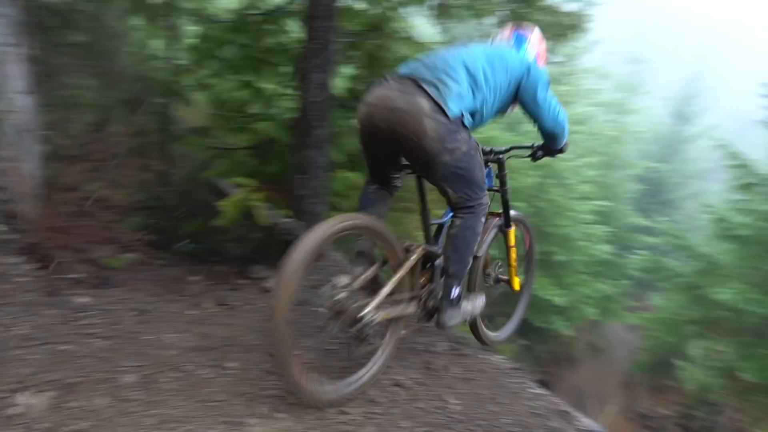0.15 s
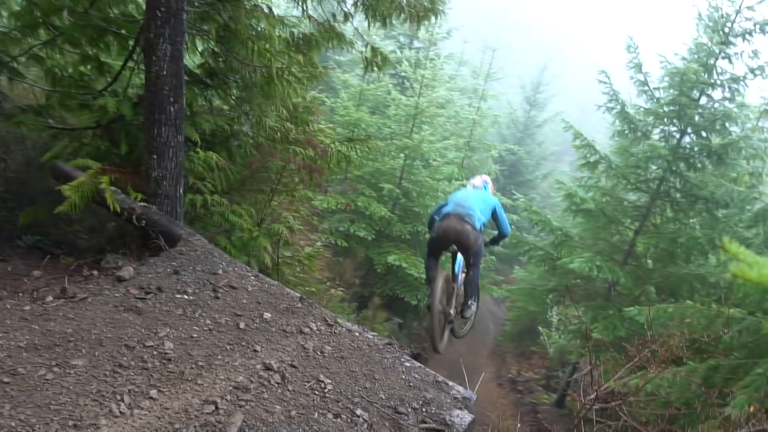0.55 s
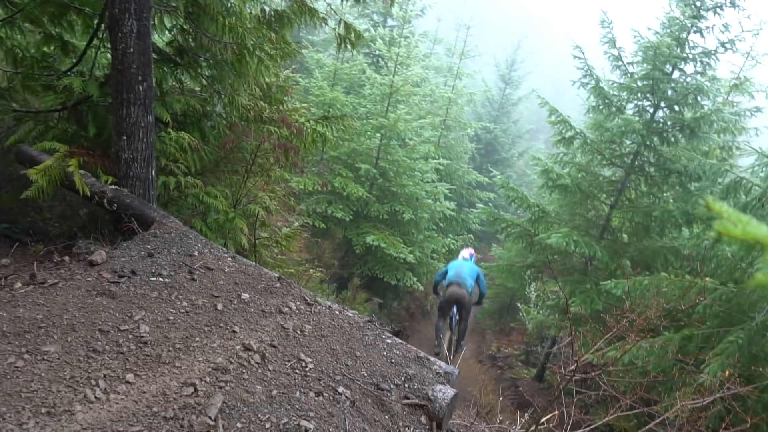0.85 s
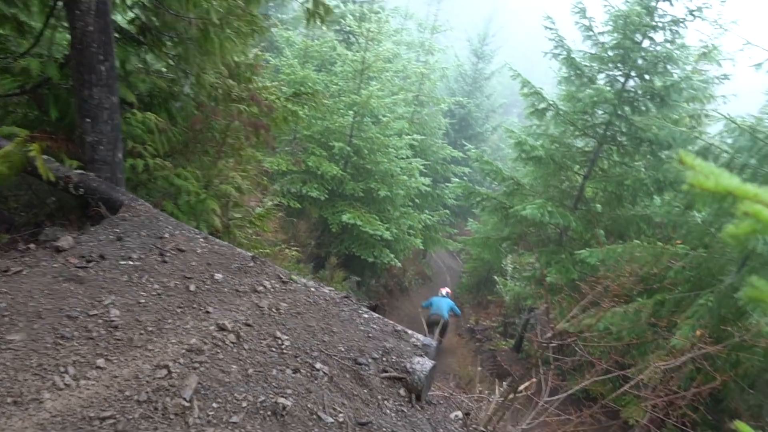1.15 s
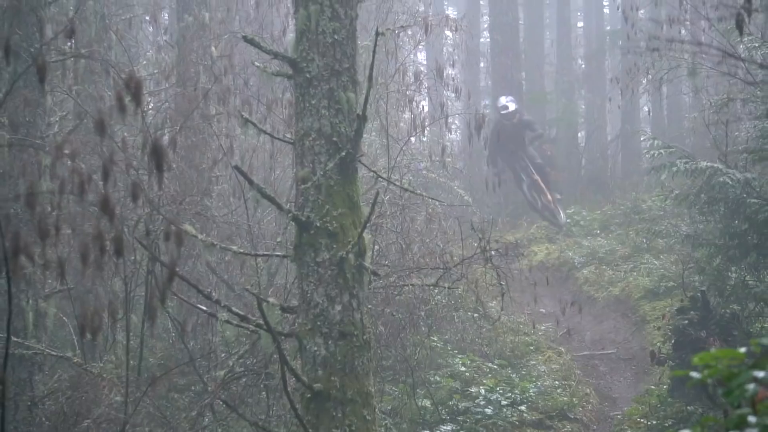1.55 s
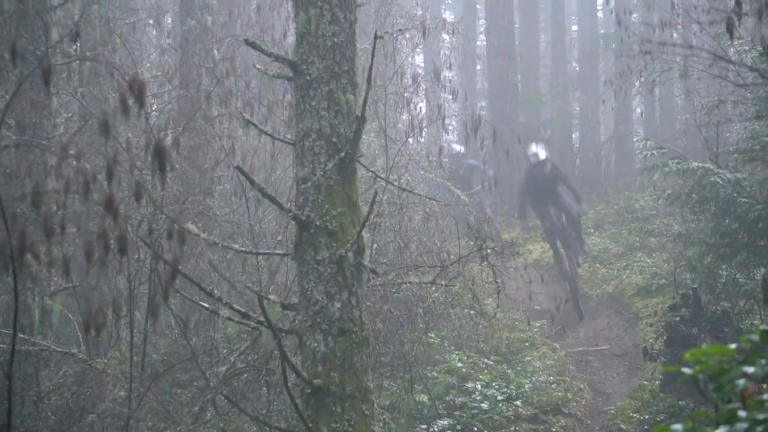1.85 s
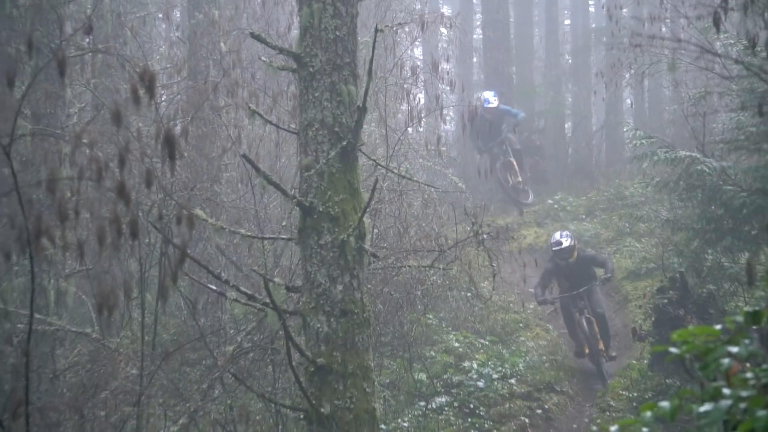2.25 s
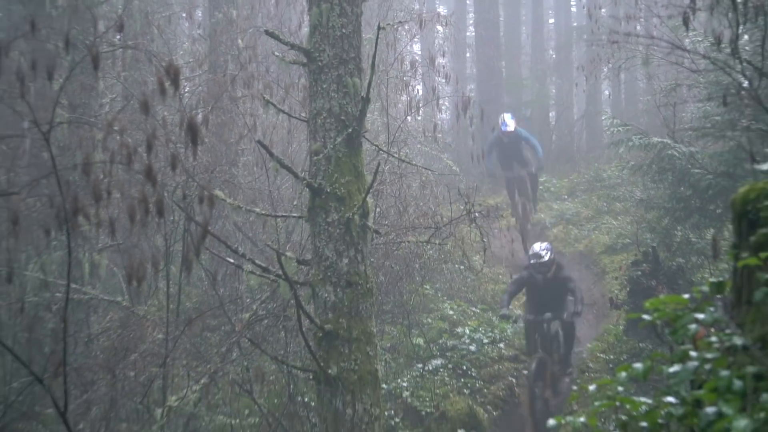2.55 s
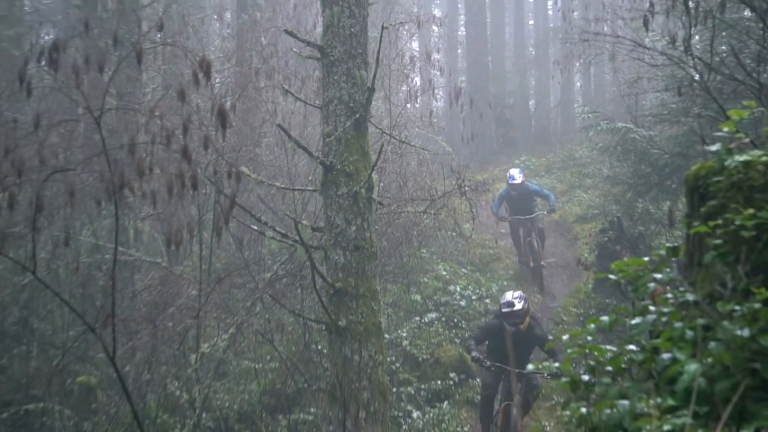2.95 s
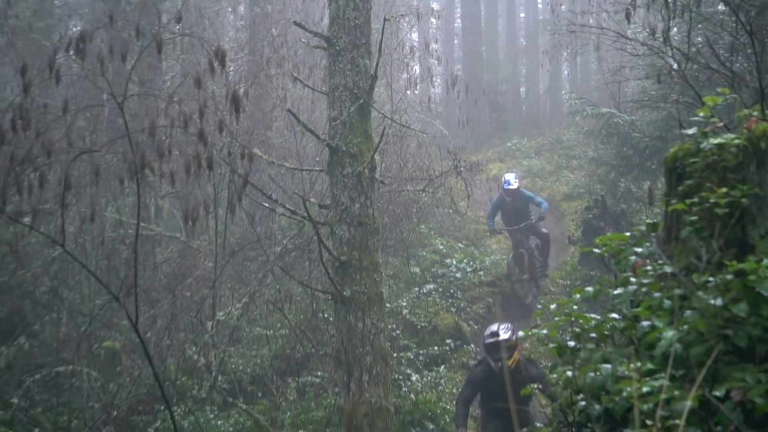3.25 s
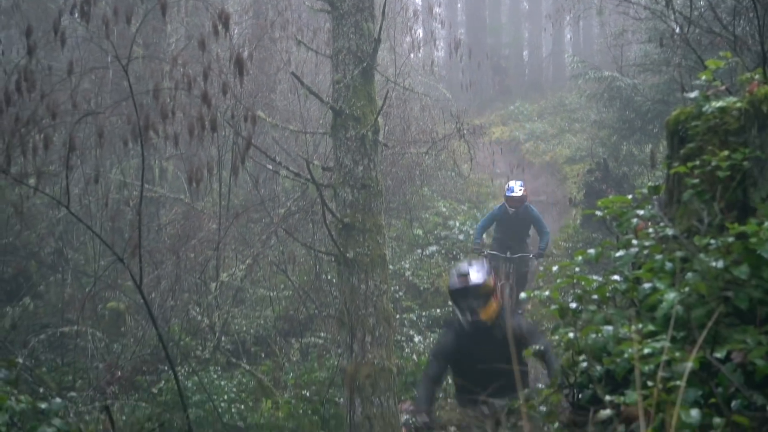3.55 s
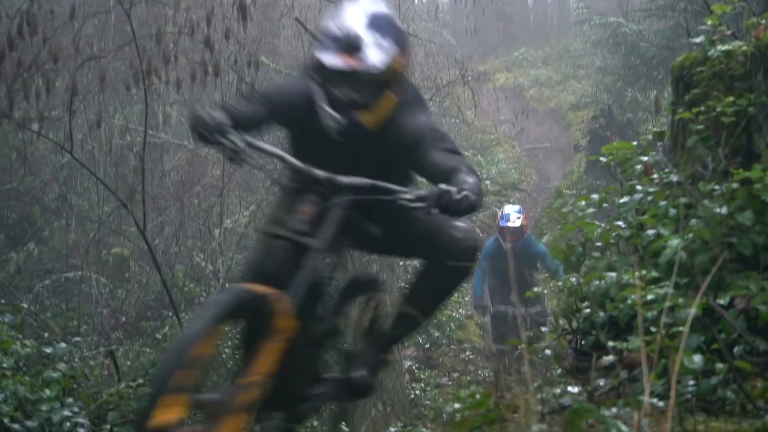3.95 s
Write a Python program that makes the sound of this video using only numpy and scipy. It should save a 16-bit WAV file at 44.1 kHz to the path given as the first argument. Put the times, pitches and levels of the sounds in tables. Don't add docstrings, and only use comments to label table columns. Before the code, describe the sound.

A mountain bike scrubs past on gravel, freehub buzzing away downhill, then a hard landing crack and two bikes rattling closer over roots and mud.

```python
import sys
import numpy as np
from scipy import signal
from scipy.fft import rfft, irfft
from scipy.io import wavfile
from scipy.ndimage import uniform_filter1d, map_coordinates

SR = 44100
rng = np.random.default_rng(int(sys.argv[2]) if len(sys.argv) > 2 else 0)


def log_audio(samples):
    frames = np.atleast_2d(samples).T
    limited = np.clip(frames, -1, 1)
    pcm = np.round(limited * 32767).astype(np.int16)
    wavfile.write(sys.argv[1], SR, pcm)


def gain_from_db(level_db):
    decades = np.asarray(level_db, float) / 20
    return 10 ** decades


N = 180631
NOW = np.arange(N) / SR

# time in seconds, scrub level in dB.
BESIDE = [(0.0, -26.5), (0.07, -33), (0.184, -35), (0.251, -38.5)]
DOWNHILL = [(0.25, -37.5), (0.396, -36.5), (0.552, -42), (0.874, -46.5), (1.055, -50)]
TOUCHDOWN = [(1.079, -57), (1.14, -44), (1.252, -37), (1.288, -39.5), (1.45, -45.5)]
APPROACH = [(1.45, -45), (1.586, -48.5), (1.77, -47), (1.95, -45), (2.08, -39.5), (2.33, -37.5),
            (2.55, -38.5), (2.74, -44), (2.81, -39), (2.914, -30.5), (2.984, -35), (3.1, -37), (3.3, -40)]
ARRIVAL = [(3.3, -37.5), (3.37, -34.5), (3.53, -37), (3.68, -32.5), (3.83, -35.5), (3.87, -37.5),
           (3.95, -36), (4.0, -35.5), (4.096, -36.5)]
# start in seconds, peak in dB, ring in Hz, 60 dB decay in seconds.
THUDS = [(1.079, -33, 72.7, 0.1), (1.126, -19.5, 78.6, 0.072), (1.198, -24.5, 128, 0.066),
         (1.23, -30.5, 185, 0.082), (1.416, -36, 114, 0.079), (2.101, -27, 61, 0.13),
         (2.191, -31, 59.2, 0.14), (2.275, -35.5, 53.8, 0.15), (2.461, -35.5, 68, 0.42),
         (2.786, -29, 70.4, 0.26), (2.866, -22, 59, 0.16), (2.989, -27, 45.8, 0.14),
         (3.329, -19.5, 112, 0.027), (3.582, -24.5, 59, 0.19), (3.451, -36, 70, .08), (3.8, -26, 84, 0.074),
         (3.88, -29, 90, 0.071), (3.931, -30, 46, 0.1), (4.018, -27.5, 138, 0.1)]


def evened(x):
    return x / np.sqrt(np.mean(x ** 2) + 1e-20)


def read(points, hz):
    f, value = np.transpose(points)
    return np.interp(np.log(hz + 1), np.log(f + 1), value)


def add(mix, s, sound):
    part = mix[:, round(s * SR):][:, :sound.shape[1]]
    part += sound[:, :part.shape[1]]


def ring(x, hz, width):
    return signal.lfilter(*signal.iirpeak(hz, hz / width, SR), x)


def pair(mid, other):
    # frequency in Hz, left-right likeness from 0 to 1.
    likeness = [(200, .99), (600, .94), (1400, .88), (2800, .72), (5500, .5), (10000, .45), (14000, .58)]
    # frequency in Hz, left minus right in dB.
    tilt = [(500, 0.4), (1400, -2.4), (5000, -2), (14000, -3.5)]
    hz, t, (a, b) = signal.stft(np.array([mid, other]), SR, nperseg=256, noverlap=192)
    same = read(likeness, hz)[:, None]
    common = np.sqrt((1 + same) / 2) * a
    apart = np.sqrt((1 - same) / 2) * b
    lean = gain_from_db(read(tilt, hz)[:, None] / 2)
    return hz, t, np.array([(common + apart) * lean, (common - apart) / lean])


def back(z):
    return signal.istft(z, SR, nperseg=256, noverlap=192)[1][:, :N]


def follow(rule, now):
    out = np.zeros(len(now))
    for rows, (db, share, db_per_s) in zip((BESIDE, DOWNHILL, TOUCHDOWN, APPROACH, ARRIVAL), rule):
        s, scrub_db = np.transpose(rows)
        change_db = np.interp(now, s, scrub_db) + 40
        level = db + share * change_db + db_per_s * (now - s[0])
        out = np.where(now >= s[0], level, out)
    return out


def trees(x):
    t = np.arange(9000) / SR
    tail = rng.standard_normal((2, len(t))) * gain_from_db(-60 * t / 0.4) * np.minimum(t / 0.004, 1)
    tail[1] = 0.8 * tail[0] + 0.6 * tail[1]
    tail = ring(tail, 4400, 5100)
    return signal.fftconvolve(x, tail / np.linalg.norm(tail[0]), axes=1)[:, :N]


def ground():
    # frequency in Hz, rumble density in dB per Hz.
    rumble = [(15, -25), (30, -4.5), (65, 0), (110, -3.5), (150, -11), (250, -26.5), (500, -45)]
    # dB at a middle scrub, share of the scrub's change,
    # drift in dB per second as the distance changes.
    soil_rule = [(-46, 0.37, -4), (-61.5, .6, -1), (-51, .1, -26), (-54.5, 0.76, 4), (-47, 0.35, 5)]
    air_rule = [(-51, 1.2, -7), (-66, 0.36, 1.5), (-52.5, .3, -10), (-59.5, 1.15, 2.5), (-52, 0.66, -1)]
    shake_s = 0.064
    shake = sum(gain_from_db(db) * (NOW > s) * np.exp(-abs(NOW - s) / shake_s) for s, db, *_ in THUDS)
    spectrum = rfft(rng.standard_normal(N)) * gain_from_db(read(rumble, np.fft.rfftfreq(N, 1 / SR)))
    soil = evened(irfft(spectrum, N))
    air = evened(ring(ring(rng.standard_normal(N), 266, 129), 266, 129))
    soil *= gain_from_db(follow(soil_rule, NOW)) + gain_from_db(-28) * shake
    air *= gain_from_db(follow(air_rule, NOW)) + gain_from_db(-24.5) * shake
    return soil + air


def freehub(rows, pawls, shell, jitter, uneven_db, turn_db, blur, clean):
    s, level_db = np.transpose(rows)
    wobble = evened(uniform_filter1d(rng.standard_normal(N), 200))
    clicks_per_s = np.interp(NOW, *np.transpose(pawls)) * np.maximum(1 + jitter * wobble, 0.1)
    teeth = np.cumsum(clicks_per_s) / SR
    size = gain_from_db(uneven_db * rng.standard_normal(int(teeth[-1]) + 1)[teeth.astype(int)])
    click = evened(np.diff(np.floor(teeth), prepend=0))
    fall = evened(np.exp(-(teeth % 1) / blur))
    swells = [evened(uniform_filter1d(uniform_filter1d(rng.standard_normal(N), 1500), 1500)) for _ in shell]
    sides = []
    for edge in clean * click, 0:
        drive = size * (edge + fall * rng.standard_normal(N))
        modes = 0
        for (hz, width, db, trend), swell in zip(shell, swells):
            gain = gain_from_db(db + turn_db * swell + trend * (NOW - s[0]))
            modes = modes + gain * ring(ring(drive, hz, width), hz, width) / np.sqrt(width)
        sides.append(evened(modes))
    return back(pair(*sides)[2]) * gain_from_db(np.interp(NOW, s, level_db, -120, -120))


def recede(x, loss):
    at = np.arange(N) * (1 - loss * np.minimum(NOW, 2) / 2)
    return np.array([map_coordinates(side, [at], order=3) for side in x])


def hub_leaving():
    # time in seconds, level in dB.
    levels = [(0.12, -41.5), (0.366, -45), (0.714, -52), (0.818, -52.5), (0.938, -64.5), (1.075, -58)]
    # time in seconds, clicks per second.
    pawls = [(0.116, 164), (0.301, 158), (0.45, 178), (0.6, 191), (0.721, 194), (0.9, 180), (1.076, 170)]
    # mode in Hz, width in Hz, level in dB, drift in dB per second as distance and angle change.
    shell = [(2100, 330, -7, 2.5), (2830, 340, -1.5, 3.5), (3500, 200, -7.5, 6.5), (4900, 280, -6, 6.5),
             (5020, 460, 6, -31), (6660, 340, 3, 3), (6940, 330, -2.5, 7), (8830, 850, 0.5, -6),
             (11500, 500, -5.5, 1), (13700, 1300, 2, -9), (15000, 1200, 6, -4)]
    buzz = freehub(levels, pawls, shell, jitter=0.015, uneven_db=0.9, turn_db=2.7, blur=0.33, clean=1.3)
    return gain_from_db(17) * recede(buzz, 0.045)


def hubs_approaching():
    # time in seconds, level in dB.
    base = [(1.45, -57), (2.6, -53), (4.1, -48)]
    # peak time in seconds, peak in dB, half length in seconds.
    facing = [(1.58, -50.5, 0.088), (1.834, -51.5, 0.043), (2.06, -65, 0.054), (2.24, -48, 0.043),
              (2.45, -62, 0.15), (2.73, -47.5, 0.13), (2.955, -44, .06), (3.17, -39.5, 0.089),
              (3.476, -40.5, 0.042), (3.813, -44.5, 0.045), (4.026, -32, 0.063)]
    # time in seconds, clicks per second.
    pawls = [(1.451, 245), (1.901, 230), (2.402, 230), (2.802, 280), (3.204, 190), (4.096, 190)]
    # mode in Hz, width in Hz, level in dB, drift in dB per second as distance and angle change.
    shell = [(7290, 390, -6, -5), (8840, 4200, -4.5, 1.5), (13110, 1000, -5, 1.4), (13500, 900, -5, 1.9),
             (15300, 2300, -9.5, 3.5)]
    now = np.arange(base[0][0], N / SR, 0.005)
    power = gain_from_db(np.interp(now, *np.transpose(base))) ** 2
    power += sum(gain_from_db(db) ** 2 * np.exp(-((now - s) / half) ** 2) for s, db, half in facing)
    levels = np.transpose([now, 10 * np.log10(power)])
    return freehub(levels, pawls, shell, jitter=0.56, uneven_db=1.2, turn_db=0.4, blur=0.6, clean=0.3)


def thud(s, peak_db, hz, t60):
    t = np.arange(18000) / SR
    push = np.sin(2 * np.pi * hz * t) * gain_from_db(-60 * t / t60) * np.minimum(t * hz / 0.38, 1)
    return s, gain_from_db(peak_db - 4) * np.array([push, push]) / abs(push).max()


def tick(s, peak_db):
    t = np.arange(300) / SR
    crack = ring(rng.standard_normal((2, len(t))) * gain_from_db(-60 * t / 0.0086), 11600, 3990)
    return s, gain_from_db(peak_db) * crack / abs(crack).max()


def close_hits():
    # start in seconds, peak in dB.
    ticks = [(0.715, -25), (0.829, -26), (0.884, -31), (1.0949, -41), (1.48, -29)]
    # start in seconds, peak in dB, ring in Hz, 60 dB decay in seconds.
    knocks = [
        (1.129, -25.5, 277, 0.04),
        (1.172, -12, 231, 0.03),
        (2.115, -32, 210, 0.022),
        (3.084, -28.5, 298, 0.041),
        (3.334, -26, 284, 0.074),
        (3.581, -25.5, 560, 0.025),
        (3.585, -38, 292, 0.059),
        (3.927, -24, 272, 0.044),
        (4.014, -24.5, 425, 0.034),
    ]
    rim = [
        (1.1688, -10, 1900, .022),
        (1.1775, -9, 2050, .018),
    ]
    gust = [
        (.21, -32, 30, .45),
    ]
    mix = np.zeros((2, N))
    for row in ticks:
        add(mix, *tick(*row))
    for row in THUDS + knocks + rim + gust:
        add(mix, *thud(*row))
    return mix


def slap(s, peak_db, hz, length, lean_db):
    # factor on the slap's centre, width in Hz, level in dB.
    frame = [(0.96, 330, 6), (0.73, 1700, 6), (1.32, 180, -7), (0.55, 2000, 9), (2.5, 3900, -11),
             (0.15, 620, 3.5)]
    t = np.arange(6000) / SR
    strikes = rng.standard_normal((2, len(t))) * (0.39 + 2.5 * (rng.random(len(t)) < 700 / SR))
    strikes[1] = 0.87 * strikes[0] + 0.49 * strikes[1]
    strikes *= np.exp(-(t / length) ** 2.4) * np.minimum(t / 0.00041, 1)
    body = sum(gain_from_db(db) * ring(strikes, k * hz, w) * np.sqrt(300 / w) for k, w, db in frame)
    body = signal.lfilter(*signal.butter(2, [0.39 * hz, 6600], "band", fs=SR), body)
    rms = np.sqrt(np.sum(body ** 2) / (2 * length * SR))
    sides = gain_from_db([[lean_db / 2], [-lean_db / 2]])
    return s, gain_from_db(peak_db - 13.5) * sides * body / rms


def clatter():
    # start in seconds, peak in dB, centre in Hz.
    away = [
        (0.017, -14.5, 2200),
        (0.035, -15, 1440),
        (0.09, -22, 2020),
        (0.1573, -20.5, 1480),
        (0.202, -23.5, 2980),
    ]
    landing = [(1.0774, -29.5, 1937), (1.1234, -23, 1780), (1.1677, -12.5, 1780), (1.183, -21, 2050),
               (1.1994, -20.5, 1970), (1.235, -22, 3700), (1.3379, -26.5, 4170), (1.4012, -23, 3120),
               (1.4144, -28.5, 2020)]
    far = [(1.709, -34, 2260), (1.955, -32, 2500), (2.006, -23.5, 3280), (2.0961, -20.5, 4430),
           (2.118, -20.5, 1650), (2.195, -21, 4300), (2.206, -15, 1670), (2.2752, -16, 2950),
           (2.29, -20, 1550), (2.308, -23.5, 3160), (2.422, -25, 2500), (2.5426, -27, 3160),
           (2.6545, -30, 2140)]
    roots = [(2.7013, -23, 1730), (2.756, -21, 2100), (2.7906, -17.5, 2230), (2.821, -29, 3370),
             (2.8455, -15.5, 2440), (2.882, -16, 1750), (2.9133, -19.5, 1570), (2.943, -18, 2000),
             (2.9791, -19, 3270), (3.035, -20, 2300), (3.137, -25.5, 1455)]
    near = [(3.2799, -26, 2080), (3.3284, -24.5, 1490), (3.3595, -23.5, 2300), (3.406, -25.5, 1460),
            (3.448, -24, 1490), (3.557, -25, 1520), (3.5863, -23.5, 3320), (3.6705, -22, 1550),
            (3.7664, -24, 1700), (3.8015, -20.5, 2350), (3.908, -20.5, 2250), (3.931, -26, 1960),
            (4.0123, -19.5, 2600), (4.03, -23, 1410)]
    # slaps, length in seconds, left minus right in dB
    stretches = ((away, 0.017, 5.3), (landing, 0.023, -4), (far, 0.018, -2.5),
                 (roots, 0.018, -3), (near, 0.022, -1.9))
    mix = np.zeros((2, N))
    for rows, length, lean_db in stretches:
        for row in rows:
            add(mix, *slap(*row, length, lean_db))
    return mix


def grit(per_s, spread_db, hiss):
    clumps = gain_from_db(1.53 * evened(uniform_filter1d(rng.standard_normal(N), 300)))
    size = gain_from_db(spread_db * np.minimum(rng.exponential(1, N), 5)) * rng.choice([-1., 1.], N)
    cracks = size * (rng.random(N) < per_s / SR)
    return evened(clumps * (evened(cracks) + hiss * rng.standard_normal(N)))


def tyres():
    # frequency in Hz, density in dB per Hz.
    gravel = [(250, -4), (420, -1), (800, 3), (2300, -5), (3800, -6.5), (10000, -17), (15600, -18.5)]
    dirt = [(250, -2), (400, 8.5), (700, 0.5), (2500, -2.5), (3500, -1.5), (5600, 1), (7200, -6),
            (10000, -9.5), (15600, -12.5)]
    trail = [(180, -4), (300, -1), (378, 2), (476, 1), (708, -2), (2290, -1.5), (3760, -4), (10300, -13.5),
             (11900, -13.5), (13400, -11.5), (15600, -20.5)]
    # dB at a middle scrub, share of the scrub's change, drift in dB per second with distance.
    mud = [(-54, 1.43, -7), (-54.5, .6, -2), (-42, 0.79, -43), (-52.5, 0.82, 2.5), (-45, 0.9, -6.5)]
    spray = [(-38, 0.056, 9), (-37, 0.83, -5), (-44, 0.96, -12), (-52.5, 0.76, 3.5), (-47.5, 0.59, 10.5)]
    s, level_db = np.transpose(BESIDE + DOWNHILL + TOUCHDOWN + APPROACH + ARRIVAL)
    hz, t, z = pair(grit(3000, 3.5, 2.0), grit(3200, 6.1, 0.61))
    low = np.clip(np.log2(1500 / (hz + 1)) / 0.25, 0, 1)[:, None]
    top = np.clip(np.log2((hz + 1) / 4200) / 1.2, 0, 1)[:, None]
    patches = uniform_filter1d(rng.standard_normal(z.shape[1:]), 4, 0)
    patches = evened(uniform_filter1d(patches, 25, 1))
    on_dirt = (t > 1.075) & (t < 1.45)
    colour_db = np.where(on_dirt, read(dirt, hz)[:, None], read(trail, hz)[:, None])
    colour_db = np.where(t < 0.25, read(gravel, hz)[:, None] + 4.6, colour_db)
    scrub_db = np.interp(t, s, level_db)
    colour_db += low * (follow(mud, t) - scrub_db + 7.5)
    colour_db += top * (follow(spray, t) - scrub_db + 7)
    colour_db -= np.interp(t, [0.2, 0.3, 1.06, 1.08], [0, 5.5, 5.5, 0])
    return gain_from_db(np.interp(NOW, s, level_db) + 9) * back(z * gain_from_db(colour_db + 1.73 * patches))


def scene():
    # time in seconds, left minus right in dB.
    sweep = [(0, 3), (0.249, .3), (.6, -1.2), (1.07, -2.8), (1.46, 0.6), (4.1, 0.3)]
    lean_db = np.interp(NOW, *np.transpose(sweep))
    bikes = tyres() + hub_leaving() + hubs_approaching()
    hits = clatter()
    return gain_from_db(lean_db / [[2], [-2]]) * bikes + ground() + hits + gain_from_db(-13) * trees(hits) + close_hits()


def roll_off(x):
    return signal.sosfilt(signal.butter(12, 15700, fs=SR, output="sos"), x)


def record(dry):
    low_pass = signal.firwin(511, 15800, window=("kaiser", 9), fs=SR)
    limited = signal.oaconvolve(dry, low_pass[None], "same")
    return roll_off(limited)


dry = scene()
out = record(dry)
log_audio(out)
```